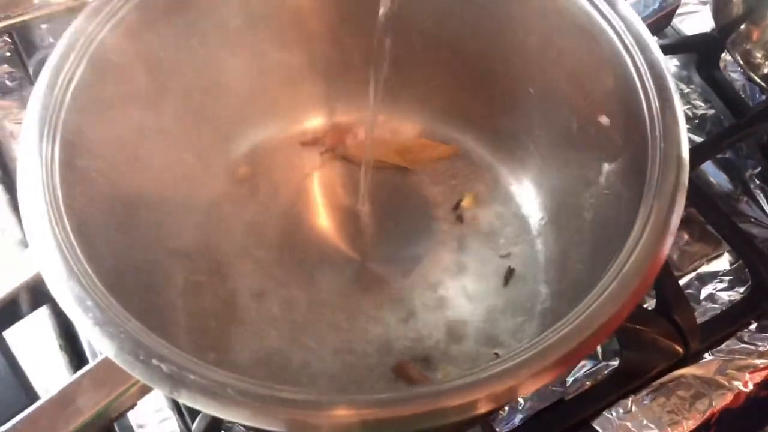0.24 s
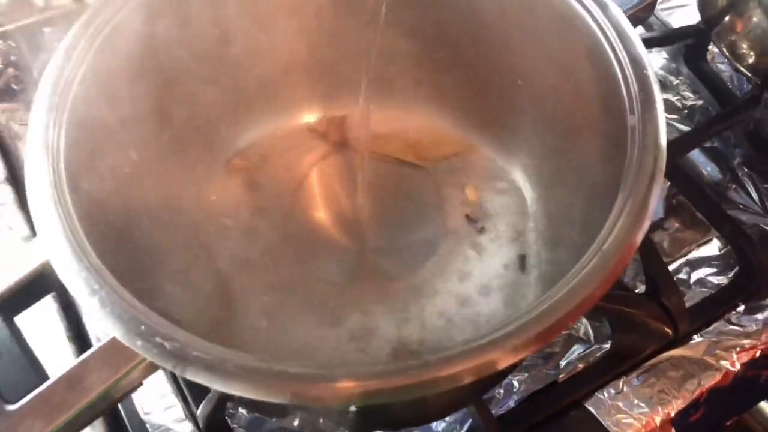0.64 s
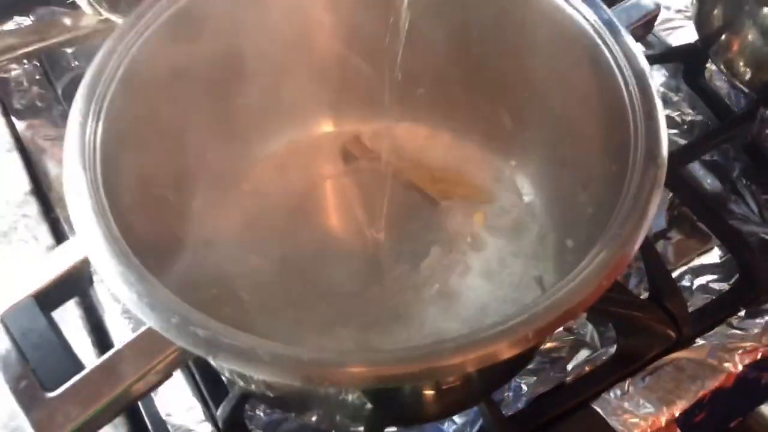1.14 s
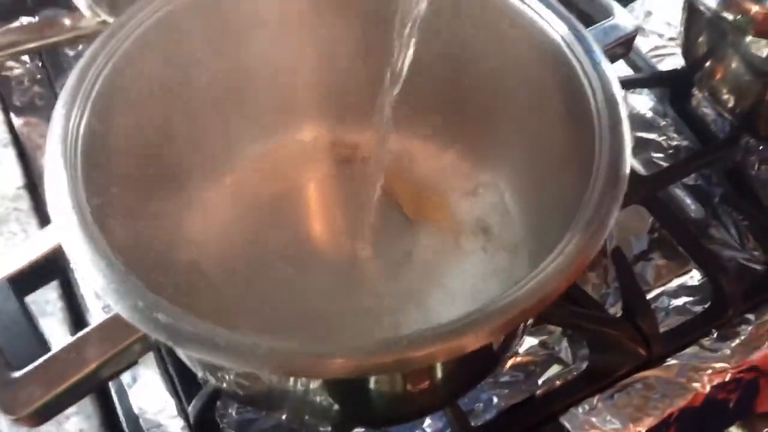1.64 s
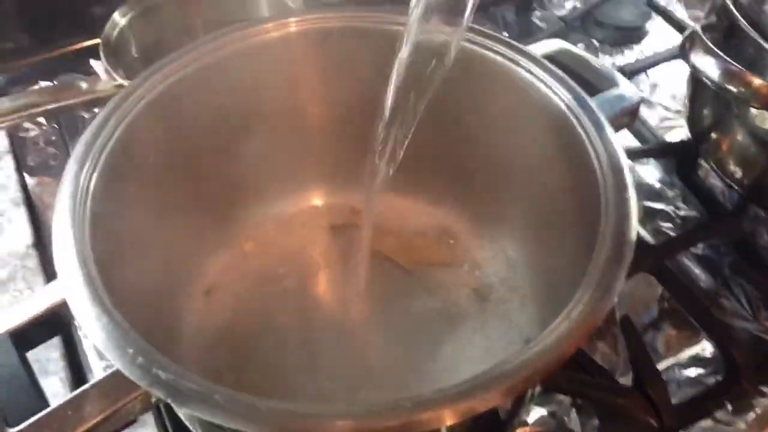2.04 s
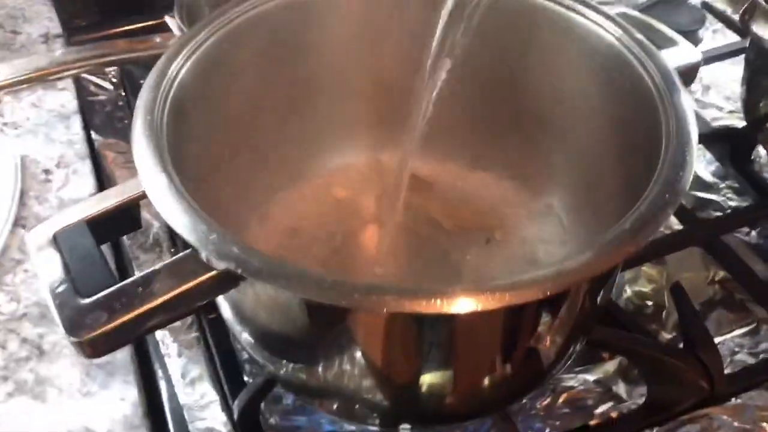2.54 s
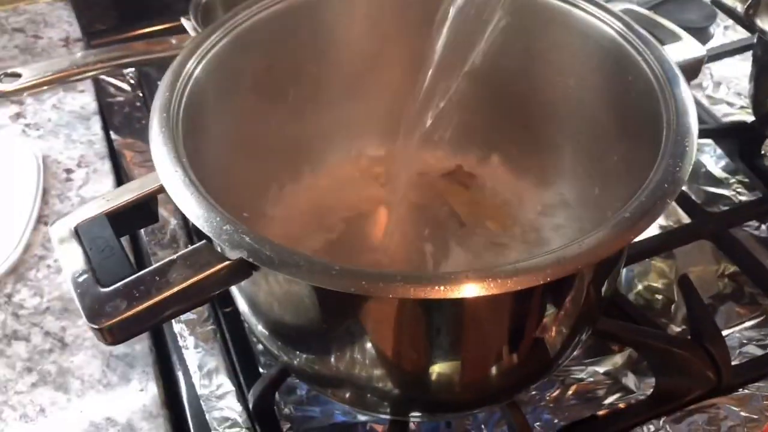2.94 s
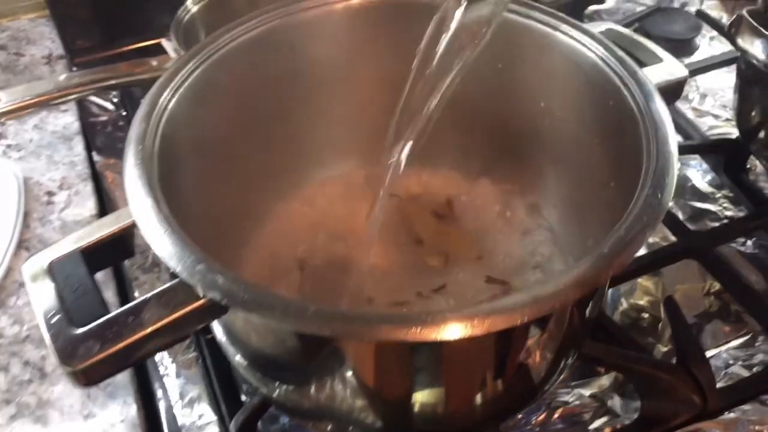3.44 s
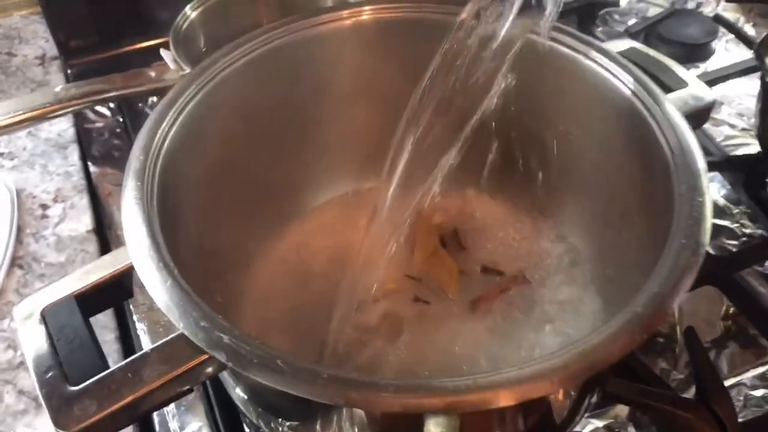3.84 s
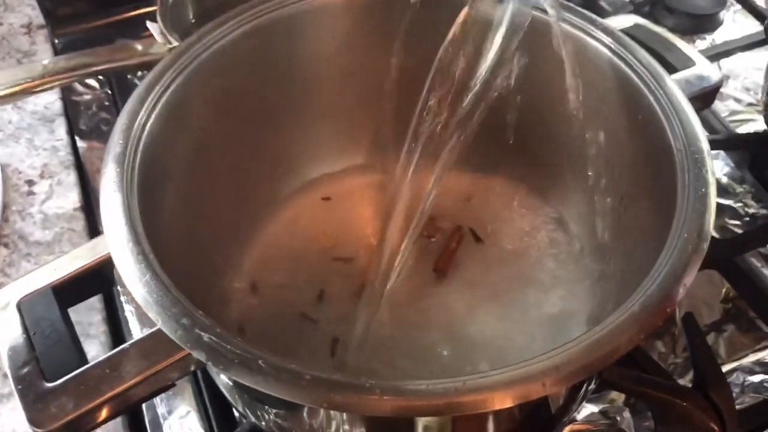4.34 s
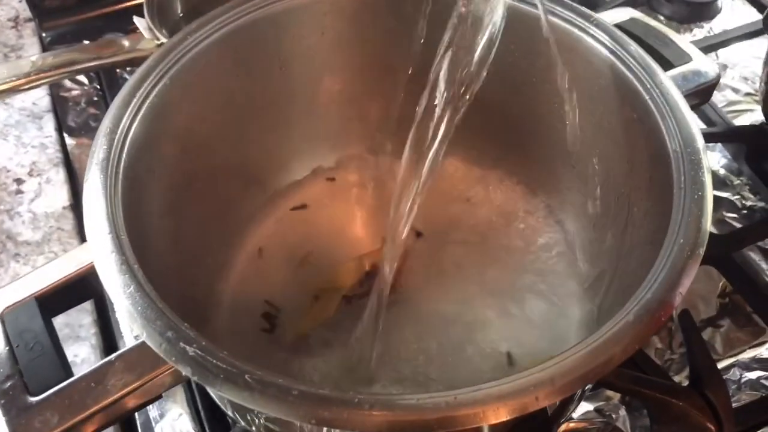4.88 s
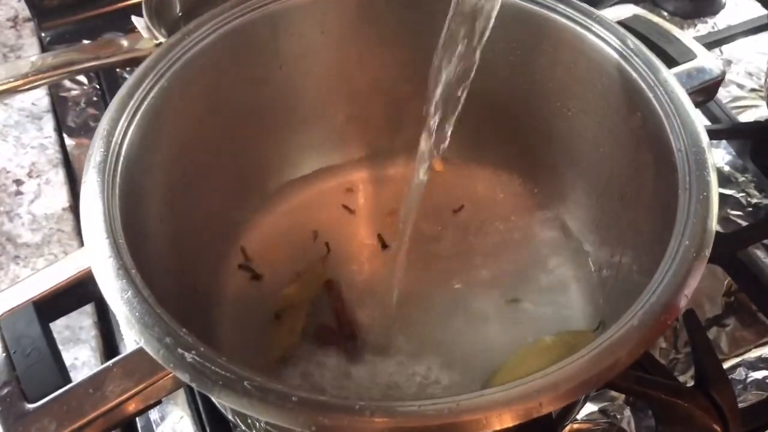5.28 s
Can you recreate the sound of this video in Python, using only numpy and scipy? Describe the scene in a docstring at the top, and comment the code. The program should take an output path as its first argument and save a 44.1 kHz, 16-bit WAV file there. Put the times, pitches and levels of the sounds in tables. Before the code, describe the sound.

Close hissing and crackling of water hitting hot oil in a metal pot, easing into a quieter pour with scattered pops.

```python
"""At a kitchen stove, a phone microphone close to a steel pot of hot oil as water pours in.
Steam bubbles burst in a dense sizzle that thins to single pops as the pot cools; the water
gurgles, the steel rings and the tiles give a short echo. A few splashes thump on the
microphone port; after the hardest thump the recorder turns its gain down and the hiss falls away."""
import sys
import numpy as np
from scipy import signal
from scipy.fft import rfft, irfft, next_fast_len
from scipy.io import wavfile
from scipy.ndimage import uniform_filter1d

SR = 44100
rng = np.random.default_rng(int(sys.argv[2]) if len(sys.argv) > 2 else 0)


def materialize(psi):
    """Save the field psi as 16-bit PCM at rate SR to the path in sys.argv[1].

    A 1-D psi becomes a single channel; in a 2-D psi each row is a channel.
    """
    bounded = np.clip(np.atleast_2d(psi).T, -1, 1)
    quanta = np.round(bounded * 32767).astype(np.int16)
    wavfile.write(sys.argv[1], SR, quanta)


N = 243095


def boil():
    """Bursting bubbles gate bands of noise; the big bursts are shared by all but the rumble."""
    # layer levels before the drop: t/s, sizzle/dB, spray/dB, gurgle/dB, hollow ring/dB
    levels = [(0, -14, -20.5, -30.5, -35), (.3, -15.5, -18.5, -32, -33), (.7, -16, -21, -30, -34.5),
              (1.1, -16, -19.5, -30, -31.5), (1.45, -17.5, -20.5, -28, -29), (1.8, -17, -21, -28.5, -28),
              (2.2, -19.5, -22, -32.5, -31.5), (2.6, -23, -21.5, -31, -31.5), (3, -22.5, -20, -32, -31.5),
              (3.35, -23.5, -26, -30.5, -31), (3.8, -22, -24, -27.5, -35), (4.15, -22, -20.5, -29.5, -37),
              (4.39, -24.5, -26, -32, -40), (5.16, -24.5, -26, -32.5, -40), (5.22, -20.5, -24, -27.5, -32),
              (5.36, -24, -26, -31, -38), (5.51, -24, -27, -30, -39)]
    sizzle_db, spray_db, gurgle_db, hollow_db = curves(levels)
    drop = gain_drop()
    big = bursts(count=1000, spread_db=2.3, t60=.04)
    ticks = bursts(count=1500, spread_db=3, t60=.001)
    steam = amp(sizzle_db) * sizzle(big, ticks) + amp(spray_db) * spray(big, ticks)
    water = amp(gurgle_db - 10.5 * drop) * gurgle(big) + amp(hollow_db - 11.5 * drop) * hollow_ring(big)
    return amp(-11 * drop) * steam + water + amp(-14 * drop) * rumble()


def sizzle(big, ticks):
    """Steam bursts through the oil in a broad crackle, mostly heard direct."""
    spectrum = [(760, -35), (1300, -14.5), (1470, -13.5), (1730, -6.5), (2590, -7.5), (2970, -3),
                (5150, -1), (12000, -8), (15600, -6), (22000, -120)]  # steam noise: f/Hz, density/dB
    small = bursts(count=5000, spread_db=5.5, t60=.0092)
    noise = patchy(depth_db=1.5) * np.sqrt(.73 + .65 * big + .35 * ticks + .4 * small)
    return unit(pot(noise, lambda f: gain_at(spectrum, f), direct_db=10))


def spray(big, ticks):
    """Very short bursts make a fine, high hiss."""
    spectrum = [(5000, -27), (7500, -1), (10000, -3), (13000, -2), (16000, -2.5)]  # spray noise: f/Hz, density/dB
    small = bursts(count=5000, spread_db=4, t60=.0013)
    noise = patchy(depth_db=-1.5) * np.sqrt(.51 + .2 * big + .25 * ticks + .67 * small)
    return unit(filtered(noise, lambda f: gain_at(spectrum, f)))


def pops():
    """Each large bubble snaps broadly around its own pitch, fizzes out and knocks the pot."""
    clearest = [(.558, -11, 4480, .005), (1.386, -2, 4050, 0.017), (1.838, 2, 8790, .005),
                (2.073, -1, 4220, .005), (2.445, 1, 7840, .025), (2.455, -5, 9730, .007),
                (2.767, 1, 7800, .004), (2.858, 0, 6200, .004), (3.113, -1.5, 5080, .014),
                (3.2665, -5, 10160, .006), (3.303, -10, 5860, .012), (3.332, -6, 6800, .004),
                (3.3986, 1.5, 4400, 0.01), (3.553, 0, 6800, 0.0046), (3.655, -3, 4500, 0.0063),
                (3.738, 0, 3660, .012), (3.986, -5.5, 4330, 0.061), (4.317, -3, 4600, .004),
                (4.337, -2.5, 8100, .028), (4.385, 3, 4400, 0.0063), (4.4708, -2.5, 3450, 0.0065),
                (4.4848, -4, 3700, .005), (4.4994, -10, 4400, 0.025), (4.5297, -12, 4000, .005),
                (4.6054, -10, 7600, .004), (4.622, -13, 6200, .013), (4.659, -13, 6800, .009),
                (4.6854, -9, 6800, 0.0049), (4.7247, -7, 6700, .004), (4.7906, -17, 3150, .008),
                (4.8085, -11, 4700, 0.0054), (4.899, -12.5, 3600, 0.017), (4.9243, -14.5, 11000, 0.028),
                (5, -4.5, 12000, .004), (5.0598, -7.5, 4200, 0.021), (5.1133, -8.5, 7450, .004),
                (5.149, -8.5, 6150, .004), (5.1739, -9.5, 6000, 0.0053), (5.1947, -5.5, 2820, 0.044),
                (5.2101, -13, 3870, 0.054), (5.2513, -7.5, 4200, 0.0046), (5.3156, -5.5, 5900, 0.012),
                (5.3196, -9.5, 4370, .03), (5.3275, -9, 14600, .005), (5.3466, -16, 6120, .005),
                (5.373, -9.5, 12600, .004), (5.3846, -21, 13200, .007), (5.4383, -11, 8000, .008),
                (5.4911, -19, 7300, .011)]  # bursting bubbles: t/s, peak level/dB, centre f/Hz, t60/s
    out, knocks, t = np.zeros(N + 2048), np.zeros(N + 2048), np.arange(2048) / SR
    f = np.fft.rfftfreq(2048, 1 / SR)
    for s, db, hz, t60 in [*clearest, *small_pops(count=110)]:
        fizz = amp(-60 * t / t60) * (1 - np.exp(-t / (.031 * t60)))
        snap = .27 * amp(-60 * t / .0027)
        crack = rng.standard_normal(2048) * (fizz + snap)
        bright = irfft(rfft(crack) * (.6 * resonance(f, 8000, 14000) + resonance(f, hz, .4 * hz)))
        out[round(s * SR):][:2048] += amp(db) * bright / np.abs(bright).max()
        knock_db = db - 5 + 9 * np.log10(t60 / .01)  # longer pops knock harder
        knocks[round(s * SR):][:2048] += amp(knock_db) * crack / np.linalg.norm(crack)
    return out[:N] + pot(knocks[:N], lambda f: resonance(f, 850, 2700), direct_db=-14)


def small_pops(count):
    """Lesser bubbles burst at random, mostly short: rows of t/s, level/dB, f/Hz, t60/s."""
    at, loud, pitch, length = rng.random((count, 4)).T
    db = -3.5 + 1.5 * np.log(loud + .01) - 11.5 * gain_drop()[(at * N).astype(int)]
    return np.transpose([at * N / SR, db, 3000 * 5 ** pitch, .0049 * (1 + 3 * length ** 3)])


def pot(x, colour, direct_db):
    """Direct sound plus the pot's resonances, which shift in four stages as water loads the steel."""
    modes = [(446, 570, 89, 3), (538, 750, 54, -5), (710, 664, 110, 0), (1135, 1107, 50, 4),
             (1270, 1107, 74, 7), (1860, 1620, 55, 2), (2380, 2320, 56, -5), (2950, 1800, 32, 7)]  # resonances: empty f/Hz, filled f/Hz, width/Hz, level/dB
    out, stage = np.zeros(N), 3 * np.arange(N) / N
    for k in range(4):
        ring = lambda f: sum(amp(db) * resonance(f, empty + (full - empty) * k / 3, width)
                             for empty, full, width, db in modes)
        share = np.sqrt(np.clip(1 - np.abs(stage - k), 0, 1))
        out += share * filtered(x, lambda f: colour(f) * (amp(direct_db) + ring(f)))
    return out


def thumps():
    """A drop on the microphone port is a step of pressure that leaks away."""
    # splashes: t/s, level/dB, push 1 or pull -1, low cut f/Hz, high cut f/Hz
    splashes = [(.7835, -6.5, 1, 72, 1500), (1.8383, -7.5, -1, 72, 1500), (1.492, -20, 1, 55, 150),
                (3.98, -21, 1, 80, 200), (4.4039, 4.5, 1, 53, 3000), (4.4213, 11.5, -1, 66, 64)]

    def steps(f):
        f = f + .01  # avoids 0 Hz
        return sum(push * amp(db) * SR / (2j * np.pi * f) * np.exp(-2j * np.pi * f * s)
                   / np.sqrt((1 + (low_hz / f) ** 6) * (1 + (f / high_hz) ** 4))
                   for s, db, push, low_hz, high_hz in splashes)
    return filtered(signal.unit_impulse(N), steps)


def gain_drop(splash_s=4.42, drop_s=.16):
    """0 before the hardest splash, 1 once the recorder's gain is down."""
    return np.clip((np.arange(N) / SR - splash_s) / drop_s, 0, 1)


def pings():
    """Single trapped bubbles ring clearly, rising a little."""
    trapped = [(2.8, -14.5, 633, 0.059), (3.985, -18.5, 380, 0.088), (3.985, -7, 4120, 0.033),
               (4.333, -5.5, 4300, 0.029), (4.788, -17, 3200, 0.019)]  # ringing bubbles: t/s, level/dB, starting f/Hz, t60/s
    out, t = np.zeros(N + 4096), np.arange(4096) / SR
    for s, db, hz, t60 in trapped:
        envelope = (1 - np.exp(-t / .0019)) * amp(db - 60 * t / t60)
        out[round(s * SR):][:4096] += envelope * np.sin(2 * np.pi * hz * t * (1 + .053 * t / t60))
    return out[:N]


def gurgle(big):
    """Water churns in the pot in slower bursts, with small bubbles ringing through."""
    spectrum = [(25, -58), (100, -24.5), (200, -8.5), (370, -4), (420, 0), (900, -7.5), (1800, -9.5),
                (3500, -8.5), (6000, -36)]  # water noise: f/Hz, density/dB
    small = bursts(count=800, spread_db=1, t60=.064)
    noise = patchy(depth_db=.8) * np.sqrt(.3 + .69 * big + .24 * small)
    churn = unit(pot(noise, lambda f: gain_at(spectrum, f), direct_db=2))
    return churn + amp(-13) * bubbles(count=500, low_hz=362, high_hz=1320, cycles=10.2)


def bubbles(count, low_hz, high_hz, cycles):
    """Small bubbles ring for a few cycles, rising in pitch; rms 1."""
    at, pitch, size = rng.random((count, 3)).T[..., None]
    hz, t = low_hz * (high_hz / low_hz) ** pitch, np.arange(600) / SR
    age = t * hz / cycles
    envelope = amp(-2.2 * np.log(1.01 - size)) * age * np.exp(-3 * age)
    ring = envelope * np.sin(2 * np.pi * hz * t * (1 + .047 * age))
    where = (at * N).astype(int) + np.arange(600)
    return unit(np.bincount(where.ravel(), ring.ravel(), N)[:N])


def hollow_ring(big):
    """The boil keeps the pot's middle resonances ringing."""
    spectrum = [(600, -23), (1000, 2.5), (1150, 0), (1300, 0), (1500, -4), (2500, -14)]  # noise driving the pot: f/Hz, density/dB
    small = bursts(count=700, spread_db=2.5, t60=.037)
    noise = patchy(depth_db=3) * np.sqrt(.53 + .31 * big + .16 * small)
    return unit(pot(noise, lambda f: gain_at(spectrum, f), direct_db=-5))


def rumble(db_per_s=4):
    """The pour's faint rumble grows as the stream widens."""
    spectrum = [(22, -40), (45, -18), (80, -4), (130, -8), (250, -31)]  # pouring noise: f/Hz, density/dB
    noise = unit(filtered(patchy(depth_db=6), lambda f: gain_at(spectrum, f)))
    return amp(-68.5 + db_per_s * np.arange(N) / SR) * noise


def dips(half_width_s=.0074):
    """Gain that makes the whole hiss dip briefly and recover."""
    drops = [(.572, -7.5), (0.791, -4.5), (.894, -7), (1.368, -7), (1.42, -6), (1.802, -6.5), (1.845, -3.5),
             (1.917, -3), (2.384, -5.5), (2.729, -3.5), (2.862, -8), (2.949, -4.5), (3.099, -6.5),
             (3.206, -4.5), (3.638, -5.5), (4.07, -7), (4.324, -4.5), (4.414, -12), (4.426, -10),
             (4.44, -6), (4.492, -9)]  # dips in the hiss: t/s, level/dB
    t = np.arange(N) / SR
    return amp(sum(db * np.exp(-((t - s) / half_width_s) ** 4) for s, db in drops))


def kitchen(x, echo_db, t60):
    """A short, diffuse echo off pot and tiles, drawn afresh every 0.4 s so it adds no fixed tone."""
    out, t, step = np.zeros(N + SR), np.arange(SR // 6) / SR, round(.4 * SR)
    for start in range(0, N, step):
        tail = rng.standard_normal(len(t)) * amp(-60 * t / t60) * (1 - np.exp(-t / .0011))
        echo = signal.fftconvolve(x[start:start + step], tail / np.linalg.norm(tail))
        out[start:start + len(echo)] += echo
    return x + amp(echo_db) * out[:N]


def bursts(count, spread_db, t60):
    """Power of many overlapping bubble bursts: quick start and decay, few large ones; mean 1."""
    at, size = rng.random((count, 2)).T
    starts = np.bincount((at * N).astype(int), amp(-2 * spread_db * np.log(1.01 - size)), N)
    power = signal.lfilter([1], [1, -amp(-120 / (t60 * SR))], uniform_filter1d(starts, size=10))
    return power / power.mean()


def patchy(depth_db):
    """White noise whose level drifts in patches of pitch and time."""
    z = signal.stft(rng.standard_normal(N + 256), nperseg=256)[2]
    field = uniform_filter1d(rng.standard_normal(z.shape), size=8, axis=0)
    field = uniform_filter1d(field, size=4, axis=1)
    return signal.istft(z * amp(depth_db * unit(field)), nperseg=256)[1][:N]


def amp(db):
    return 10 ** (np.asarray(db) / 20)


def unit(x):
    return x / np.sqrt(np.mean(x ** 2) + 1e-20)


def gain_at(spectrum, hz):
    """Gain between (Hz, dB) points on a log axis."""
    f, db = np.transpose(spectrum)
    return amp(np.interp(np.log(hz + 1), np.log(f + 1), db))


def curves(rows):
    """One value per sample for each column after the time."""
    s, *cols = np.transpose(rows)
    return [np.interp(np.arange(N) / SR, s, c) for c in cols]


def filtered(x, response):
    """x through a complex frequency response."""
    m = next_fast_len(N + 8192)
    return irfft(rfft(x, m) * response(np.fft.rfftfreq(m, 1 / SR)), m)[:N]


def resonance(f, hz, width_hz):
    return 1j * f * width_hz / (hz * hz - f * f + 1j * f * width_hz)


def scene():
    """Close mono: the pot with its echoes, the splashes right on the port."""
    hiss = dips() * kitchen(boil(), echo_db=-10, t60=.1)
    return (hiss + kitchen(pops() + pings(), echo_db=-17.5, t60=.12) + thumps())[None]


def record(dry, ceiling=.9, top_hz=15900):
    """The phone's band filters delay each pitch by about 1.2 cycles, so a step becomes a falling
    sweep; peaks are softly squeezed and the top is cut off."""
    swept = filtered(dry[0], lambda hz: np.exp(-2j * np.pi * 1.239 * np.log((hz + 2.6) / 159.6)))
    squeezed = swept / (1 + np.abs(swept / ceiling) ** 4) ** (1 / 4)
    return filtered(squeezed, lambda hz: hz < top_hz)[None]


dry = scene()
out = record(dry)
materialize(out)
```